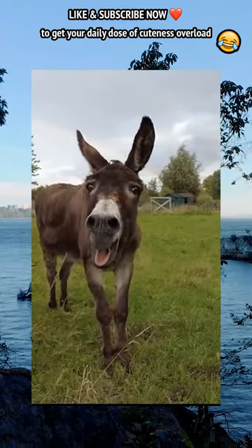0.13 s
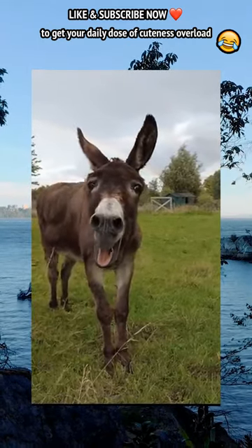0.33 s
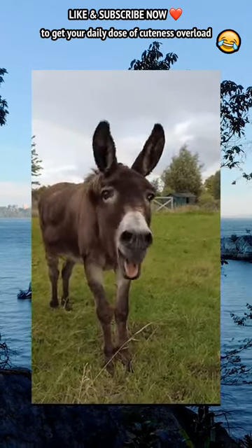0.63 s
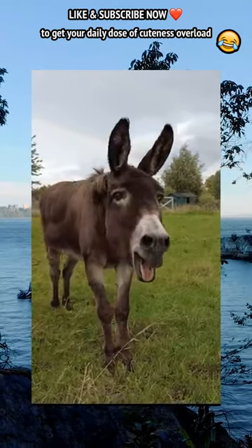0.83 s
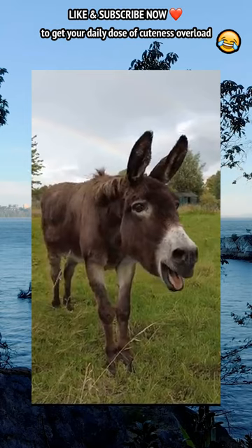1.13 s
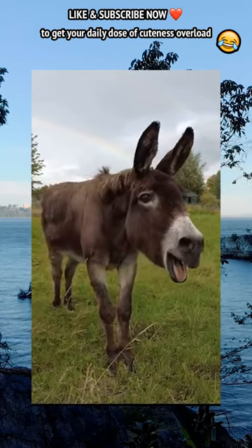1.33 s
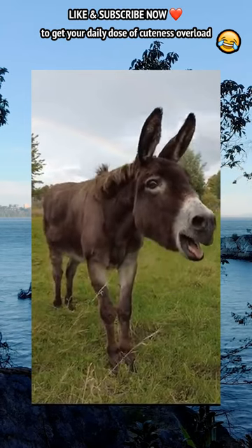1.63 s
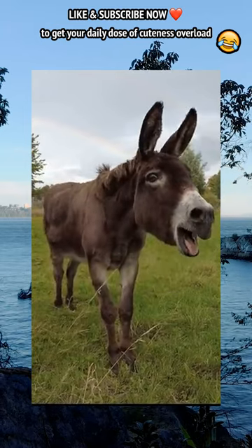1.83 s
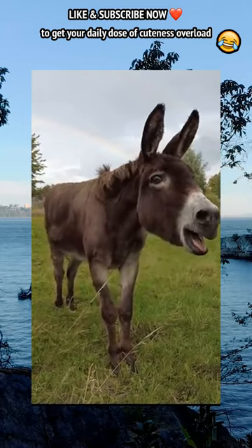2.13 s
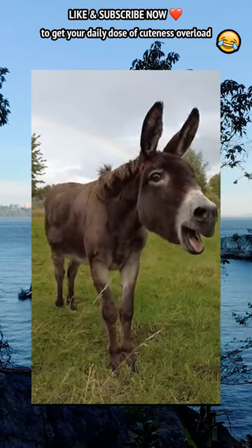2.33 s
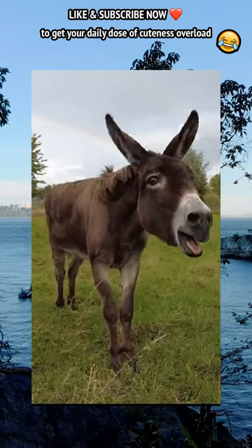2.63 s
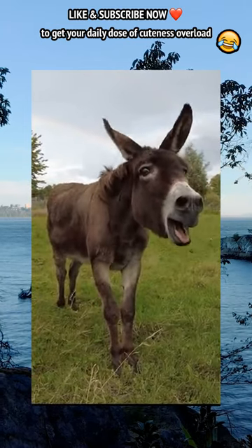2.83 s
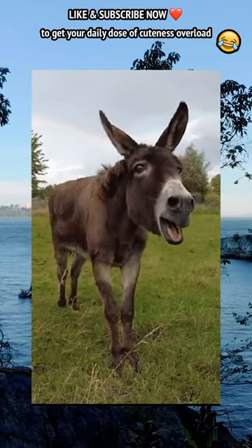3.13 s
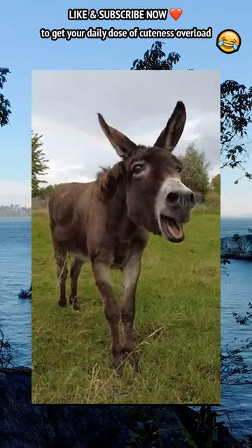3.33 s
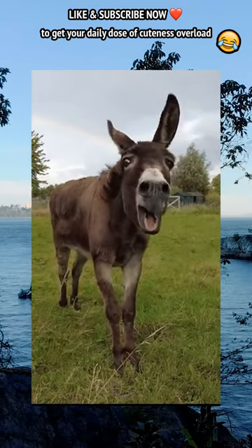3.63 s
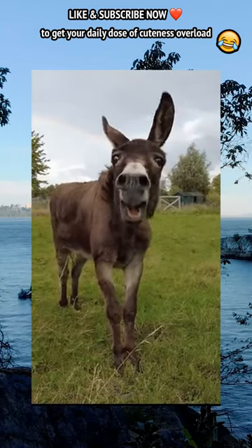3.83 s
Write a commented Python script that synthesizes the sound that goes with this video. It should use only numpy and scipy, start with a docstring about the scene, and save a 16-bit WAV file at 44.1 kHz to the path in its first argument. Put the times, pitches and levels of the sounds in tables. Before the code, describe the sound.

Close to the microphone, a donkey works up a bray in seven quick rounds of creaking, whistling gasps and grunting. The squeals grow stronger and end in full hee-haws, over faint open-air wind.

```python
"""Donkey braying in an open field

Seven close rounds. In each the vocal folds creak ever more slowly, the in-breath squeals through the
tight larynx, the folds let go in a quickening grunt and air rushes out of the mouth. In the last three
rounds that rush breaks into a loud two-voiced haw. Light wind rumbles underneath."""
import sys
import numpy as np
from scipy import signal
from scipy.fft import rfft, irfft
from scipy.io import wavfile
from scipy.ndimage import uniform_filter1d

SR = 44100
rng = np.random.default_rng(int(sys.argv[2]) if len(sys.argv) > 2 else 0)


def dump_mix(stems):
    """Bounce the given channels to the path in sys.argv[1] as a 16-bit WAV at rate SR."""
    frames = np.atleast_2d(stems).T  # one column per channel
    limited = np.clip(frames, -1, 1)  # hard clip at full scale
    pcm = np.round(limited * 32767).astype(np.int16)
    wavfile.write(sys.argv[1], SR, pcm)


N = 176400

# in-breaths: t/s, length/s, rasp/dB, wheeze/dB, bright resonance/Hz, its level/dB
INBREATHS = [(0.234, 0.098, -32, -27, 9400, -85), (0.719, 0.11, -28.5, -23, 9300, -45),
             (1.232, 0.14, -30, -22, 9330, -33.5), (1.764, 0.13, -30, -27, 9300, -37),
             (2.289, 0.14, -29.5, -25.5, 8350, -37), (2.844, 0.18, -33, -40.5, 7900, -48),
             (3.422, 0.17, -30.5, -48.5, 8040, -48.5)]
# colour of the rasp: f/Hz, width/Hz, level/dB
RASP_FORMANTS = [(820, 100, -7.5), (1650, 470, -8), (2604, 330, 0.5), (3098, 60, 10.5), (4500, 770, 0),
                 (5200, 220, 6.5), (5800, 170, -16.5), (7800, 130, 1.5), (9430, 250, -5.5),
                 (10500, 180, -13.5), (13150, 480, -11.5), (15000, 700, -14.5)]
# the larynx just short of whistling: f/Hz, width/Hz, level/dB
WHEEZE_FORMANTS = [(5800, 67, -2), (5560, 110, -5.5), (5960, 170, -1.5)]
# whistles, one curve for each register the in-breath jumps to: t/s, f/Hz, level/dB
WHISTLES = [
    [(.255, 5660, -36), (.284, 5860, -24), (.293, 5800, -45)],
    [(.28, 6040, -42), (.297, 6140, -29), (.309, 6100, -38)],
    [(.745, 5730, -30), (.769, 5880, -18.5), (.781, 5900, -30)],
    [(.78, 6080, -25), (.81, 6040, -37)],
    [(1.274, 6150, -18), (1.312, 6160, -16)],
    [(1.308, 5620, -31), (1.318, 5580, -13), (1.34, 5360, -34)],
    [(1.79, 5860, -28.5), (1.812, 5780, -10.5)],
    [(1.812, 6050, -23), (1.831, 6200, -19)],
    [(1.828, 5960, -20.5), (1.854, 5446, -9.5), (1.888, 5440, -38)],
    [(2.312, 5680, -35.5), (2.327, 5820, -16), (2.364, 5670, -14.5)],
    [(2.36, 5550, -17.5), (2.371, 5450, -8.5), (2.415, 5440, -12), (2.442, 5360, -42)],
    [(2.87, 5430, -58.5), (2.888, 5405, -18), (2.92, 5436, -9.5), (2.956, 5384, -11), (2.986, 5380, -22),
     (3.0, 5350, -45)],
    [(3.445, 5320, -54), (3.467, 5456, -14), (3.489, 5460, -11.5), (3.508, 5360, -9), (3.55, 5372, -11),
     (3.575, 5200, -33.5)],
]
# the head turning: t/s, left minus right/dB
HEAD_PAN = [(.3, 2), (1.3, 1.5), (1.84, -2.5), (2.38, -2.5), (2.93, -2.5), (3.5, -1.75)]

def squeals():
    """Air drawn through the tight larynx rasps, wheezes and catches in whistles that jump register."""
    t, air = clock(), 0
    rasp, wheeze = hiss(RASP_FORMANTS), hiss(WHEEZE_FORMANTS)
    for start, length, rasp_db, wheeze_db, bright_hz, bright_db in INBREATHS:
        flow = np.sin(np.pi * np.clip((t - start) / length, 0, 1))
        bright = undb(bright_db) * hiss([(bright_hz, 420, 0)])
        air += flow ** 2 * (undb(rasp_db + .5) * rasp + undb(wheeze_db) * wheeze + bright)
    tones = undb(.5 + .5 * wander(160)) * sum(whistle(curve) for curve in WHISTLES)
    squeal = tones + air * unit(undb(3.1 * wander(220)))
    pan_db = SIDE / 2 * np.interp(t, *np.array(HEAD_PAN).T)
    lead = np.exp(.22j * pan_db)  # the louder side also leads in phase
    return (signal.hilbert(squeal) * lead).real * undb(pan_db)


def whistle(curve, jitter_hz=32):
    """One wavering whistle; when loud it gains a hoarse octave and a ragged tone at half its pitch."""
    hz, gain = automation([curve])
    phase = phase_of(hz + jitter_hz * wander(350))
    octave = undb(-12 + 2 * wander(90)) * np.cos(2 * phase + .5 * wander(900))
    subtone = undb(-26) * wander(500) * np.cos(phase / 2)
    return np.sqrt(2) * gain * (np.cos(phase) + np.sqrt(gain) * (octave + subtone))


# upper voice, one curve a haw: t/s, f/Hz, level/dB
HAW_HOOT = [
    [(2.606, 906, -44), (2.63, 799, -21), (2.654, 871, -29), (2.672, 818, -60)],
    [(3.142, 854, -50), (3.172, 792.6, -20), (3.204, 833, -23.5), (3.222, 830, -42)],
    [(3.702, 886, -51), (3.722, 775, -19), (3.752, 805.4, -22.5), (3.775, 850, -32)],
]
# lower voice, one curve a haw: t/s, f/Hz, fundamental/dB, overtones/dB
HAW_BUZZ = [
    [(2.59, 341.0, -48, -67.5), (2.602, 343.6, -46, -50.5), (2.654, 348.7, -27.5, -47),
     (2.694, 349.1, -30, -72), (2.74, 362.5, -54.5, -76)],
    [(3.14, 367.8, -54, -43), (3.176, 347.3, -24, -55), (3.21, 332.3, -13.5, -21), (3.258, 340.6, -22, -50),
     (3.32, 367.8, -49.5, -72)],
    [(3.7, 334.7, -46, -75), (3.76, 332.8, -14, -28), (3.771, 325.5, -13.5, -16), (3.83, 318.6, -18, -23.5),
     (3.884, 359.8, -35.5, -53), (3.9, 358.9, -45, -50)],
]
# timbre of the upper voice: harmonic number, level/dB
HOOT_OVERTONES = [(2, -14), (3, -24.5)]
# timbre of the lower voice: harmonic number, level/dB
BUZZ_OVERTONES = [(2, -6), (3, 0), (4, -14.5), (5, -12), (6, -8.5), (7, -11), (8, -21.5), (9, -34),
                  (10, -28.5), (13, -29.5)]
# the open mouth, for haws and out-breaths: f/Hz, width/Hz, level/dB
MOUTH_FORMANTS = [(400, 150, -4.5), (880, 110, -3), (1120, 100, 3), (1430, 237, 1), (1770, 210, -6.5),
                  (2220, 130, -27), (4000, 1900, -24.5), (7600, 6500, -33.5), (13200, 2400, -41)]

def haws(jitter=.0067):
    """A high hoot hands over to a low buzz; together they beat into sum and difference tones."""
    high_hz, high_gain = automation(HAW_HOOT)
    low_hz, low_gain, buzz_gain = automation(HAW_BUZZ)
    high_phase = phase_of(high_hz * (1 + jitter * wander(240)))
    low_phase = phase_of(low_hz * (1 + jitter * wander(250)))
    hoot = high_gain * undb(7.5) * (np.cos(high_phase) + overtones(high_phase, HOOT_OVERTONES))
    body = low_gain * np.sin(low_phase)
    buzz = buzz_gain * undb(-2 + 2 * wander(340)) * overtones(low_phase, BUZZ_OVERTONES)
    sum_tone = undb(20) * np.cos(high_phase + low_phase)
    difference_tone = undb(7) * np.cos(high_phase - low_phase)
    beats = high_gain * low_gain * (sum_tone + difference_tone)
    flutter = 1 + .21 * np.cos(low_phase)
    rasp = undb(-6) * (high_gain + .21 * buzz_gain) * flutter * hiss(MOUTH_FORMANTS)
    return np.sqrt(2) * (hoot + body + buzz + beats) + rasp


# grunts: t/s, length/s, first gap/s, fastest gap/s, rattle/dB, hum/dB
GRUNTS = [(0.3158, 0.11, 0.0087, .0043, -9.5, -16.5), (0.8315, 0.083, 0.0088, 0.0047, -10.5, -16.5),
          (1.3688, 0.067, 0.0098, 0.0053, -14, -16.5), (1.9036, 0.06, 0.0081, 0.0059, -14, -16.5),
          (2.4564, 0.048, .009, .0058, -18.5, -19), (3.0215, 0.036, 0.011, 0.0047, -16, -19.5),
          (3.5898, 0.043, 0.014, 0.0052, -17, -20.5)]
# the throat while grunting: f/Hz, width/Hz, level/dB
GRUNT_FORMANTS = [(422.5, 68, 5.5), (950, 180, 2.5), (1400, 130, 4), (1805, 75, 5.5), (2106, 67, 4),
                  (2498, 93, 1), (3033, 42, 7.5), (3524, 140, -3), (4120, 96, 2.5), (4750, 48, -3),
                  (5450, 160, -2.5), (6000, 120, -2.5), (7650, 1700, -20), (12400, 1500, -29.5)]

def grunts(quickening=.5, bite_hz=4210, vowel_start_hz=1123, vowel_end_hz=792, chest_hz=385):
    """Snaps quicken as the folds let go, then soften until only the low resonances ring."""
    rattle, rings, k = np.zeros(N), np.zeros(N), np.arange(32)
    for start, length, first, fastest, rattle_db, hum_db in GRUNTS:
        gap_jitter, level_jitter, pitch_jitter = rng.standard_normal((len(k), 3)).T
        gaps = fastest + (first - fastest) * quickening ** k
        gaps *= 1 + .04 * np.minimum(k / 6, 1) * gap_jitter
        elapsed = np.cumsum(gaps) - gaps
        times, progress = start + elapsed, np.minimum(elapsed / length, 1)
        # the rattle swells for a fifth of the grunt, then fades
        size = (progress < 1) * undb(level_jitter - 4 * np.maximum(1 - progress / .2, 0))
        fade_db = 26.5 * np.maximum(progress - .2, 0) / .8
        rattle += clicks(times, size * undb(rattle_db + 19 - fade_db))
        bite = size * undb(.5 + 2 * rattle_db - fade_db)  # only the hardest snaps ring bright
        rings += ring(times, bite, np.full(len(k), bite_hz), decay_s=.0037)
        vowel = size * undb(hum_db - 2) * np.exp(-((progress - .7) / .49) ** 2)
        vowel_hz = vowel_end_hz + (vowel_start_hz - vowel_end_hz) * (1 - progress) ** 2
        rings += ring(times, vowel, vowel_hz, decay_s=.0079)
        chest = size * undb(hum_db - 4) * progress ** 1.7
        rings += ring(times, chest, chest_hz * (1 + .092 * pitch_jitter), decay_s=.012)
    throat = resonate(puffed(rattle, db=-24, fade_s=.0093), GRUNT_FORMANTS)
    low_cut = signal.butter(4, 300, "high", fs=SR, output="sos")
    return throat + signal.sosfilt(low_cut, rings)


def ring(times, sizes, hz, decay_s):
    """Each snap sets off a damped tone of its own pitch."""
    out, age = np.zeros(N + SR), np.arange(2048) / SR
    for at, size, f in zip(times, sizes, hz):
        out[int(at * SR):][:len(age)] += size * np.sin(2 * np.pi * f * age) * np.exp(-age / decay_s)
    return out[:N]


# creaks: t/s, last snap/s, last gap/s, level/dB
CREAKS = [(0.132, 0.2425, 0.024, -13.5), (0.627, 0.7175, 0.03, -17), (1.139, 1.2186, 0.019, -22.5),
          (1.687, 1.758, 0.029, -22), (2.207, 2.2676, 0.024, -25.5), (2.784, 2.823, .017, -26),
          (3.361, 3.385, .023, -26), (3.961, 3.99, 0.021, -29.5)]
# hardest pops within the creaks: t/s, level/dB
HARD_POPS = [(0.1955, 12.5), (.2069, 7.5), (0.6795, 9), (0.6916, 12.5), (1.1967, 6.5), (1.7322, 8.5),
             (2.2663, 4.5)]
# the throat while creaking: f/Hz, width/Hz, level/dB
CREAK_FORMANTS = [(383, 40, 6.5), (864, 122, 4), (1344, 42, 3.5), (1687, 220, 0), (2325, 190, -2.5),
                  (3176, 110, -5.5), (4317, 363, -6), (5190, 120, -7.5), (5665, 160, -7), (6206, 76, -4.5),
                  (7510, 760, -17), (11800, 1300, -29.5), (14700, 190, -30.5)]

def creaks(fastest_gap_s=.0088, swell_db_per_s=200.5, hold_s=.036):
    """The vocal folds snap ever more slowly and strongly as they tighten."""
    snaps, k = np.zeros(N), np.arange(16)
    for start, last, last_gap, db in CREAKS:
        gaps = fastest_gap_s + (last_gap - fastest_gap_s) * .16 ** k  # counted back from the last snap
        before = np.cumsum(gaps) - gaps
        swell_db = 26 - swell_db_per_s * np.maximum(before - hold_s, 0)
        sizes = undb(db + swell_db + .16 * rng.standard_normal(len(k)))
        snaps += clicks(last - before, sizes * (last - before >= start))
    pop_times, pop_db = np.array(HARD_POPS).T
    # a hard pop takes the place of the nearby snap
    near_pop = np.abs(clock()[:, None] - pop_times).min(axis=1) < .008
    snaps = np.where(near_pop, clicks(pop_times, undb(pop_db)), snaps)
    return resonate(puffed(snaps, db=-21.5, fade_s=.0042), CREAK_FORMANTS)


def puffed(snaps, db, fade_s):
    """A short puff of turbulent air follows every snap."""
    return snaps + undb(db) * noise() * signal.lfilter([1], [1, -np.exp(-1 / (fade_s * SR))], snaps)


# out-breaths: t/s, length/s, air/dB, hum/dB
OUTBREATHS = [(-.04, .11, -40.5, -56), (0.471, 0.1, -42.5, -52), (0.966, 0.1, -39, -66),
              (1.478, .16, -39, -44), (2.013, 0.14, -38.5, -41), (2.549, 0.17, -37.5, -60),
              (3.097, 0.2, -34.5, -63.5), (3.664, .22, -33.5, -59.5)]
# tiny throat squeaks, mostly as the breath stops: t/s, f/Hz, level/dB
SQUEAKS = [(1.628, 1990, -38.5), (2.151, 2010, -37.5), (2.356, 2950, -20.5), (2.727, 2113, -44.5),
           (3.301, 1900, -37), (3.909, 1740, -31.5)]

def outbreaths(fade_s=.036, hum_hz=365, squeak_s=.0043, rise_hz_per_s=9600):
    """Air blows out of the open mouth with a faint hum, often ending on a tiny rising squeak."""
    t, air, hum, squeaks = clock(), 0, 0, 0
    for start, length, air_db, hum_db in OUTBREATHS:
        envelope = np.clip((t - start) / fade_s, 0, 1) * np.clip((start + length - t) / fade_s, 0, 1)
        air += undb(air_db) * envelope
        hum += undb(hum_db) * envelope
    for at, hz, db in SQUEAKS:
        offset = t - at
        chirp = np.sin(2 * np.pi * (hz + rise_hz_per_s * offset / 2) * offset)
        squeaks += undb(db) * np.exp(-(offset / squeak_s) ** 2) * chirp
    air *= undb(1.3 * wander(120)) * hiss(MOUTH_FORMANTS)
    hum *= np.sin(phase_of(hum_hz * (1 + .023 * wander(67))))
    return air + hum + squeaks * (1 + wander(800))


def reflections(x, t60_s, db):
    """A diffuse tail of reflections, different in each ear."""
    t = clock()[:SR]
    tail = rng.standard_normal((2, SR)) * undb(-60 * t / t60_s) * (t > .003)
    tail *= undb(db) / np.sqrt(np.sum(tail ** 2) / 2)
    return signal.fftconvolve(x, tail, axes=1)[:, :N]


# air bed of wind and far field: f/Hz, level/dB
HUSH_SPECTRUM = [(20, -3.5), (40, -8.5), (70, -8.5), (125, -7.5), (200, -17.5), (300, -23.5), (600, -22.5),
                 (1200, -32), (2500, -38), (5000, -45.5), (10000, -49), (16000, -53)]
# low end of the wind: f/Hz, level/dB
RUMBLE_SPECTRUM = [(15, -11.5), (35, -14), (60, -14), (110, -28), (300, -64.5), (2000, -93)]
# gusts riding the rumble: t/s, level/dB
GUSTS = [(0.0, -45.5), (2.66, -40.5), (2.87, -45), (4.0, -61)]

def wind():
    """Faint, slightly wide open-air hush over gusts of rumble."""
    hush_gain = undb(-44 + .43 * wander(12))
    hush = coloured(HUSH_SPECTRUM) + undb(-12) * coloured(HUSH_SPECTRUM) * SIDE
    gust_gain = undb(np.interp(clock(), *np.array(GUSTS).T) - 1.5)
    return hush_gain * hush + gust_gain * coloured(RUMBLE_SPECTRUM)


SIDE = np.array([[1], [-1]])  # opposite polarity left and right

def undb(db):
    """Decibels to gain."""
    return 10 ** (np.asarray(db) / 20)


def unit(x):
    """Scale to rms 1."""
    return x / np.sqrt(np.mean(x ** 2))


def clock():
    """Time of every sample."""
    return np.arange(N) / SR


def noise():
    """White noise."""
    return rng.standard_normal(N)


def wander(rate_hz):
    """Smooth random modulation at rms 1."""
    width = max(int(SR / rate_hz), 1)
    return unit(uniform_filter1d(uniform_filter1d(noise(), width), width))


def phase_of(hz):
    """Running phase of a pitch."""
    return 2 * np.pi * np.cumsum(hz) / SR


def overtones(phase, harmonics):
    """A stack of harmonics locked to one phase."""
    return sum(undb(db) * np.cos(round(k) * phase) for k, db in harmonics)


def resonate(x, formants):
    """Formant filter that rolls off below 300 Hz."""
    f = np.arange(4097) * SR / 8192
    power = sum(undb(db) ** 2 / (1 + ((f - hz) / (width / 2)) ** 2) / (1 + ((f - hz) / (width * 4)) ** 2)
                for hz, width, db in formants)
    power = power * f ** 6 / (f ** 6 + 300 ** 6) + 1e-9
    cepstrum = irfft(np.log(power) / 2)
    cepstrum[1:4096] *= 2  # minimum phase: no ringing ahead of a snap
    cepstrum[4097:] = 0
    return signal.fftconvolve(x, irfft(np.exp(rfft(cepstrum))))[:N]


def hiss(formants):
    """Breath noise through formants, at rms 1."""
    return unit(resonate(noise(), formants))


def coloured(spectrum):
    """Noise shaped by an EQ curve, at rms 1."""
    hz, db = np.array(spectrum).T
    f = np.maximum(np.arange(N // 2 + 1) * SR / N, 1)
    return unit(irfft(rfft(noise()) * undb(np.interp(np.log(f), np.log(hz), db)), N))


def automation(calls):
    """Pitch and gain curves of a series of calls, gated off in between."""
    t, rows = clock(), np.vstack(calls)
    sounding = sum(1. * ((t >= call[0][0]) & (t <= call[-1][0])) for call in calls)
    gate = uniform_filter1d(sounding, size=160)
    hz, *levels = (np.interp(t, rows[:, 0], column) for column in rows[:, 1:].T)
    return [hz] + [gate * undb(db) for db in levels]


def clicks(times, sizes):
    """One impulse at each time."""
    return np.bincount(np.clip(times * SR, 0, N - 1).astype(int), sizes, N)


def scene():
    """The bray, its reflections off the ground and far trees, and the wind."""
    voice = creaks() + grunts() + haws() + outbreaths()
    ground = reflections(voice[None], t60_s=.05, db=-18)[0] * SIDE
    bray = voice + ground + squeals()
    return bray + reflections(bray, t60_s=.5, db=-35) + wind()


def record(dry, cutoff_hz=15900):
    """A steep high cut takes off the top of the treble."""
    return signal.sosfilt(signal.ellip(10, .2, 80, cutoff_hz, fs=SR, output="sos"), dry)


dry = scene()
out = record(dry)
dump_mix(out)
```